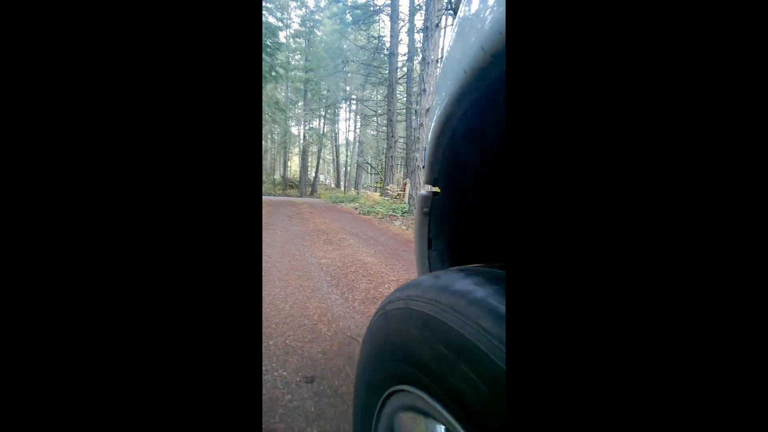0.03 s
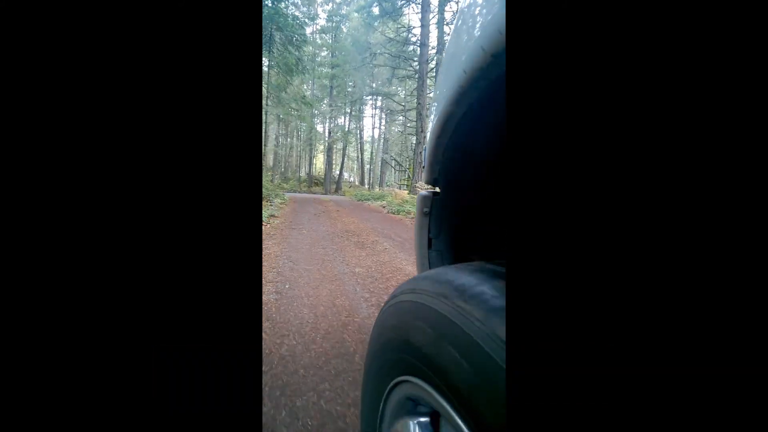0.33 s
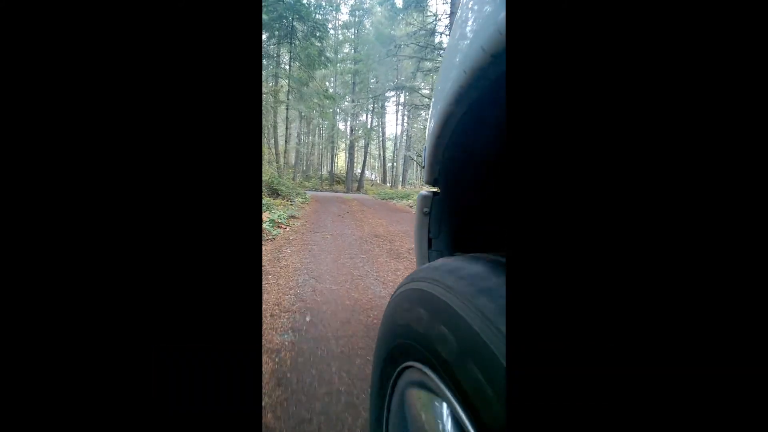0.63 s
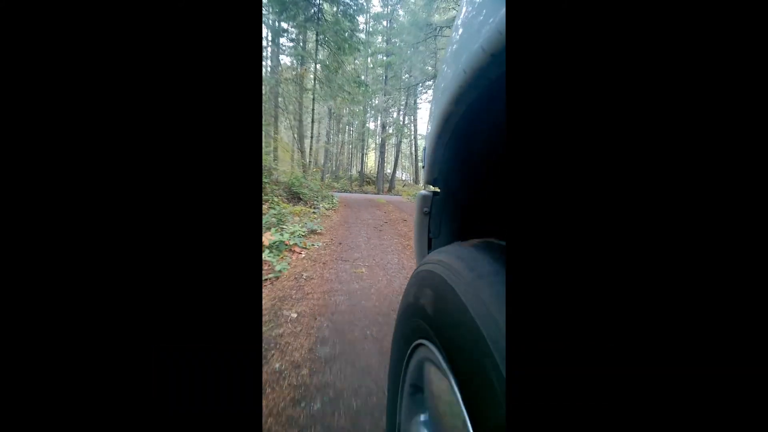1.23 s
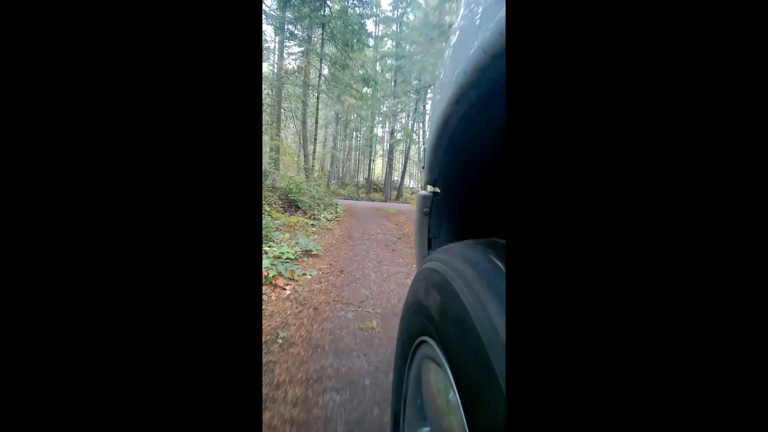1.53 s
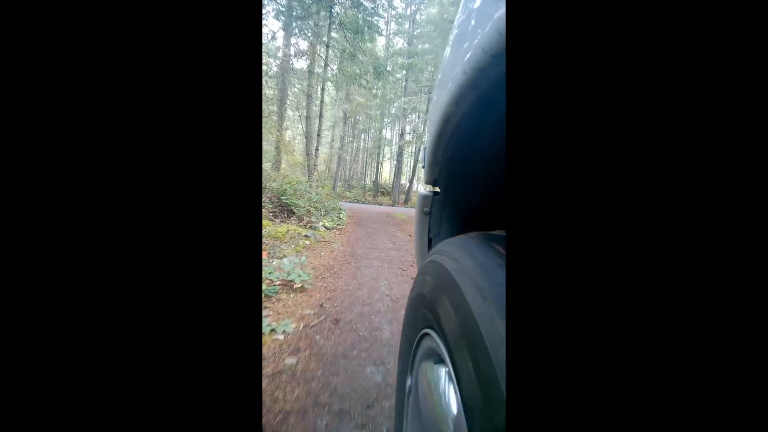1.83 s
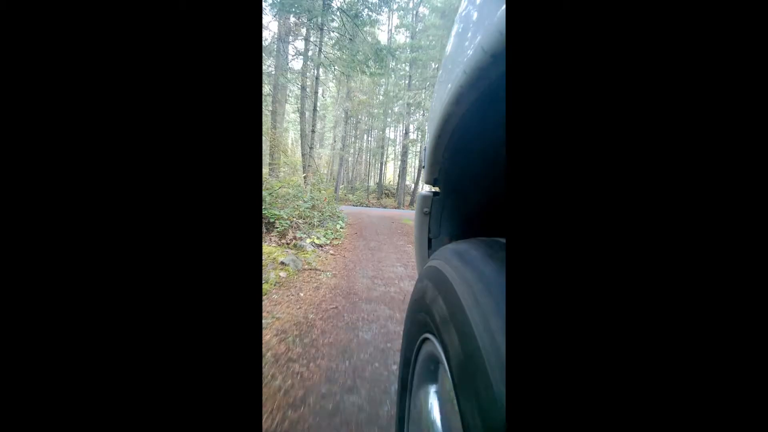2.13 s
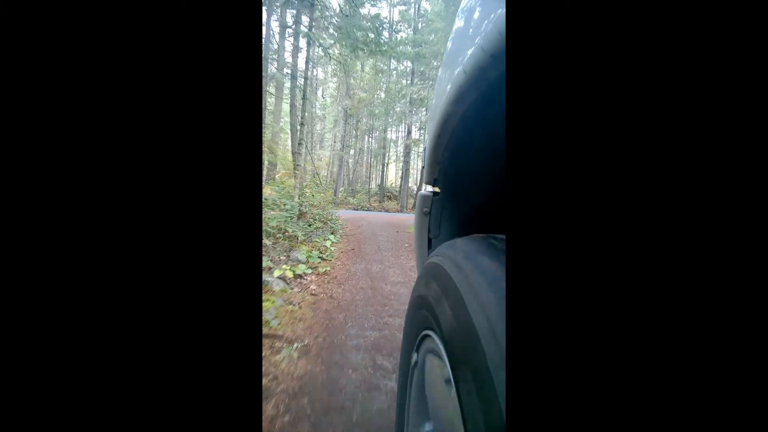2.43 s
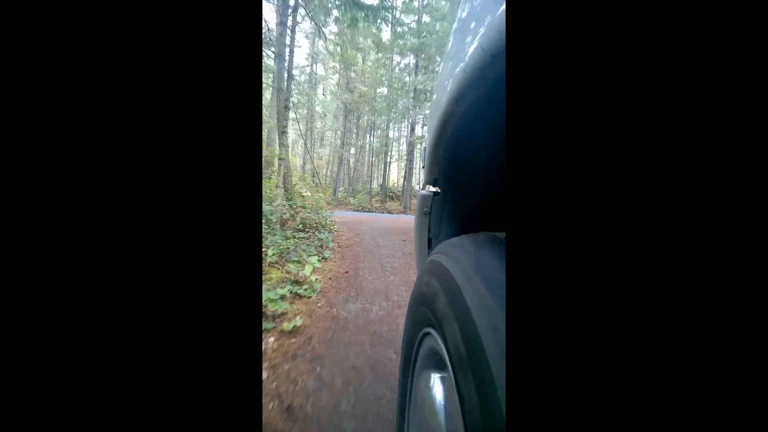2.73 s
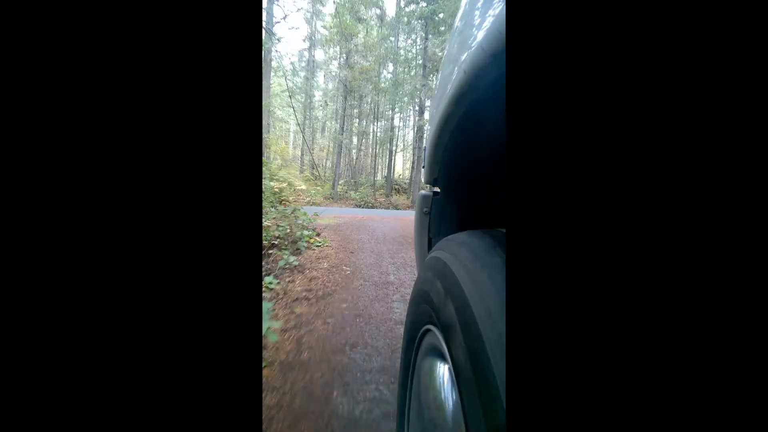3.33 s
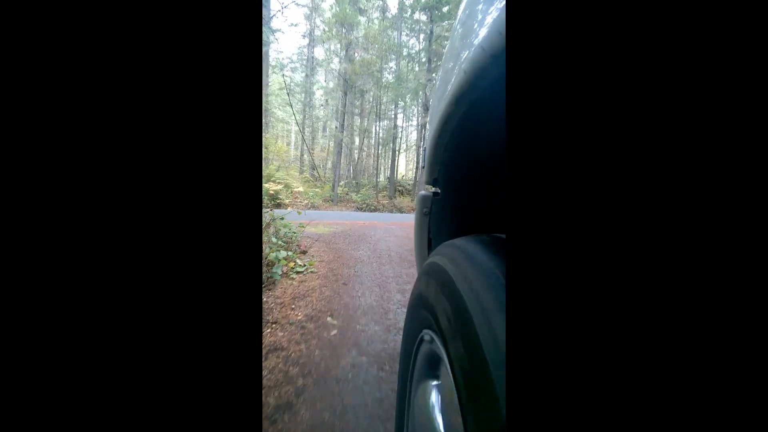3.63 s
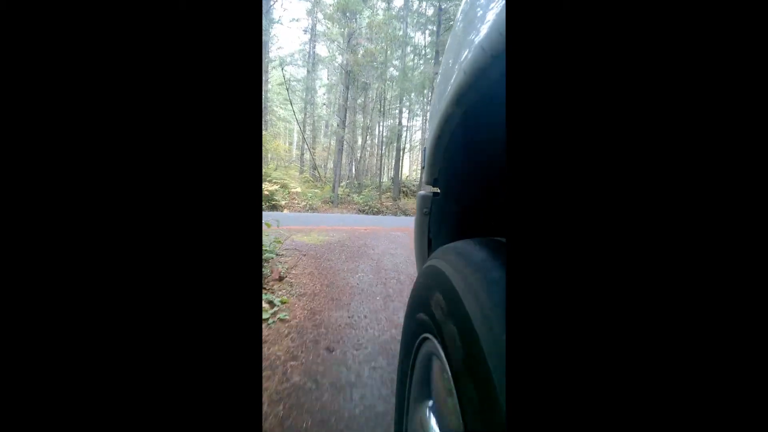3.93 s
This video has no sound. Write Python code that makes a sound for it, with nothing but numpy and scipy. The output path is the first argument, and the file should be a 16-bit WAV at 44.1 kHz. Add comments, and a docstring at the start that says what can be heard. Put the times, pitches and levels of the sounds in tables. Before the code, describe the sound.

A truck engine drones and eases off as its tyre rushes and crackles over grit.

```python
"""On a gritty forest road, a V8 truck rolls along, heard from just behind a front wheel.
The exhaust drones and spits a hissing tick once per crank turn, until the driver lifts off and the
engine slows. The tyre rushes and crackles over grit while the uneven road makes the body rumble.
Three stones knock, two sprays of debris rake the wheel well, and the wheel thuds into a rut.
Now and then the rushing sound dips for an instant, and thin glassy tones sound in the gap."""
import sys
import numpy as np
from scipy import signal
from scipy.fft import rfft, irfft
from scipy.io import wavfile
from scipy.ndimage import uniform_filter1d

SR = 44100
rng = np.random.default_rng(int(sys.argv[2]) if len(sys.argv) > 2 else 0)


def log_audio(samples):
    """Write samples as a 16-bit WAV file to the path given in sys.argv[1]."""
    # one column per channel
    frames = np.atleast_2d(samples).T
    # limit to full scale, then quantise
    limited = np.clip(frames, -1, 1)
    pcm = np.round(limited * 32767).astype(np.int16)
    wavfile.write(sys.argv[1], SR, pcm)


N = 176400
TIME = np.arange(N) / SR
FREQS = np.fft.rfftfreq(N, 1 / SR)

# brief dips in the rushing sound (time [s], depth [0-1])
RUSH_DIPS = [(.813, .82), (.983, .8), (1.046, .88), (1.537, .9), (1.643, .84), (1.795, .84), (1.963, .82),
             (2.05, .84), (2.199, .82)]


def exhaust(cycles):
    """Exhaust pulses make a stack of tones: a drone with the pedal down, a burble when coasting."""
    # how far the pedal is down (time [s], throttle [0-1])
    pedal = [(0, 0.76), (2.6, 1), (2.78, 0.45), (2.92, 0.63), (3.25, 0.12), (4, 0)]
    # engine tones (pitch [multiple of the cycle rate], level under load [dB], level coasting [dB])
    tones = [(3.03, -42, -27), (4.97, -21.5, -20), (7.06, -20, -24), (8, 0.5, 1.5), (8.99, -31, -21),
             (9.98, -36, -11), (11, -12, -25), (12, -26, -19), (13, -12, -14.5), (14, -32, -21),
             (15, -30.5, -22), (15.95, -34.5, -5.5), (16.82, -32.5, -22), (19, -29.5, -34),
             (20.05, -33.5, -32), (21.09, -22.5, -17.5), (23, -35.5, -29), (24.08, -27, -34),
             (25.8, -26.5, -32), (29.16, -43, -16.5), (31.88, -34.5, -30)]
    # loudness of the whole drone (time [s], level [dB])
    drone_levels = [(0, -11.5), (.5, -12), (1.1, -13), (1.6, -14), (1.9, -12.5), (2.1, -14.5), (2.42, -13),
                    (2.75, -17.5), (2.92, -21), (3.15, -22), (3.6, -26), (4, -25)]
    firing_order = 8  # eight cylinders fire in each cycle
    throttle, cycle_hz = curve(pedal), np.gradient(cycles, TIME)
    drone, power = 0, 0
    for order, load_db, coast_db in tones:
        gain = amp(coast_db + throttle * (load_db - coast_db) + pipe_db(order * cycle_hz))
        waver_db = (0.92 if order == firing_order else 1.33) * drift(rate_hz=3.6)
        drone += gain * amp(waver_db) * np.sin(2 * np.pi * (order * cycles + rng.random()))
        power += gain ** 2 / 2
    return amp(curve(drone_levels)) * drone / np.sqrt(power)


def pipe_db(hz):
    """The exhaust pipe boosts tones near the pitches it naturally rings at."""
    # pipe resonances (frequency [Hz], width [Hz], boost [dB])
    pipe_peaks = [(165, 24, 8), (224, 14, 7), (265, 13, 9)]
    return boost_db(hz, pipe_peaks)


def engine_hiss(cycles):
    """Gas hisses under load, and two of the eight cylinders each add a bright, ticking puff."""
    # when the ticks fall (place in the engine cycle [0-1])
    tick_places = [.02, .555]
    # tone colour of the hiss (frequency [Hz], level [dB])
    hiss_colour = [(150, -19), (350, 0.5), (550, 1), (950, -3.5), (1400, -1.5), (2000, -0.5), (2900, 1),
                   (3750, -6), (4700, -0.5), (5400, -6.5), (6200, -1.5), (8000, -4), (9200, -5.5),
                   (10500, -7), (12500, -11.5), (14500, -19), (16000, -14)]
    # extra brightness of a tick (frequency [Hz], boost [dB])
    tick_tilt = [(500, -16), (2000, -11), (4500, -4), (6500, 0), (12000, 1.5), (16000, 1.5)]
    # ticks compared with the hiss (time [s], level [dB])
    tick_levels = [(0, -4.5), (.6, -6), (1.2, -7), (2.2, -4), (2.6, -2), (3, -18)]
    # loudness of hiss and ticks together (time [s], level [dB])
    hiss_levels = [(0, -26.5), (.55, -26), (1.1, -26), (1.5, -27.5), (1.9, -27.5), (2.2, -28.5),
                   (2.4, -34.5), (2.68, -32), (2.9, -39.5), (4, -35.5)]
    # strength of the top treble (time [s], boost [dB])
    treble_levels = [(0, 2), (.6, 1.5), (1.2, -0.5), (2, -4.5), (2.7, -3.5)]
    tick_spread_db, treble_hz = 2.2, 10800
    puffs, cycle_s = np.zeros(N), np.gradient(TIME, cycles)
    for place in tick_places:
        count = cycles - place + 1  # passes a whole number at each tick
        strength = amp(tick_spread_db * rng.standard_normal(size=100))[count.astype(int)]
        puffs += strength * strike(count % 1 * cycle_s, rise_s=0.004, decay_s=0.009)
    hiss = noise(hiss_colour, well_db())
    tick_noise = noise(hiss_colour, well_db() + spectrum(tick_tilt))
    hiss += amp(curve(tick_levels)) * unit(puffs) * tick_noise
    lower = irfft(rfft(hiss) / (1 + (FREQS / treble_hz) ** 8), N)
    treble = hiss - lower
    return amp(curve(hiss_levels)) * (lower + amp(curve(treble_levels)) * treble)


def tyre():
    """The rolling tread makes a fluttering rush and crushes grit."""
    # tone colour of the tread (frequency [Hz], level [dB])
    tread_colour = [(190, -26), (330, -6), (388, -20), (470, -2), (510, -4), (704, -8), (800, -10),
                    (1650, -10), (2390, -11.5), (2810, -12.5), (7630, -16), (15500, -31.5)]
    # loudness of the tyre (time [s], level [dB])
    tyre_levels = [(0, -30.5), (1.2, -31.5), (2.2, -29.5), (2.75, -30), (3, -32), (3.3, -32), (3.6, -30.5),
                   (3.8, -32.5), (4, -35)]
    rush = noise(tread_colour, 0.78 * well_db()) * amp(0.79 * drift(rate_hz=30))
    return amp(curve(tyre_levels)) * (rush + amp(-9) * grit())


def grit(pitches=14, grains_per_s=600, spread_db=5):
    """Each crushed grain rings for a few vibrations, from dull pops to fine crackle."""
    # tone colour of the grit (frequency [Hz], level [dB])
    grit_colour = [(200, -1), (500, 6.5), (1300, 1.5), (3000, -12.5), (7000, -5), (11000, -10),
                   (16000, -32)]
    crackle = np.zeros(N)
    for hz in np.geomspace(450, 11000, pitches):
        sizes = amp(spread_db * np.minimum(rng.exponential(1, N), 4.5))
        crushed = rng.random(N) < grains_per_s / pitches / SR
        hits = sizes * crushed * rng.choice([-1, 1], N)
        vibrations = hz * TIME[:SR // 40]
        pop = np.sin(2 * np.pi * vibrations) * np.exp(-vibrations / 1.4)
        crackle += unit(signal.oaconvolve(hits, pop)[:N]) * np.sqrt(hz)
    return colour(crackle, grit_colour)


def well_db():
    """The wheel well, the hollow around the tyre, boosts a few narrow bands of pitch."""
    # wheel well resonances (frequency [Hz], width [Hz], boost [dB])
    well_peaks = [(2320, 65, 3), (2670, 41, 1.5), (3280, 41, 3), (4726, 90, -2), (6100, 61, 4),
                  (6400, 120, 0), (7882, 110, 3), (9880, 310, 3)]
    return boost_db(FREQS, well_peaks)


def rumble():
    """The uneven road shakes the truck's body."""
    # tone colour of the shaking (frequency [Hz], level [dB])
    rumble_colour = [(10, -26), (22, -13), (36, 2.5), (55, -8), (90, -2), (150, -2.5), (210, -13),
                     (300, -10.5), (420, -19), (800, -45)]
    # loudness of the shaking (time [s], level [dB])
    rumble_levels = [(0, -33), (.6, -28.5), (1, -37), (1.5, -28), (1.75, -27), (2.2, -28), (2.6, -28),
                     (3, -30), (3.5, -32.5), (4, -29.5)]
    return amp(curve(rumble_levels) + 1.8 * drift(rate_hz=5.6)) * noise(rumble_colour)


def stones(ring_delay_s=0.00149):
    """Stones knock on the wheel well: a dull crunch, then a ring that quickly dies."""
    # stone hits (time [s], level [dB], decay [s])
    hits = [(1.589, -12.5, 0.0054), (2.786, -26.5, 0.016), (3.563, -25, 0.025)]
    # tone colour of the crunch (frequency [Hz], level [dB])
    crunch_colour = [(100, -20), (300, -4), (700, 3), (1000, 3.5), (1280, 1), (1800, -4), (2600, -5),
                     (4000, -12), (8000, -30), (16000, -48)]
    # tones of the struck wheel well (frequency [Hz], relative level [dB], decay [s])
    ring_tones = [(660, -6.5, 0.01), (983, -8.5, .006), (1320, -5.5, 0.011), (2530, -8, 0.0043),
                  (3080, 3, .003)]
    crunch, ring = 0, 0
    for start, db, decay_s in hits:
        crunch += amp(db) * strike(since(start), rise_s=0.0012, decay_s=decay_s)
        age = since(start + ring_delay_s)
        for hz, tone_db, ring_s in ring_tones:
            ring += amp(db + tone_db) * np.sin(2 * np.pi * hz * age) * np.exp(-age / ring_s)
    return crunch * noise(crunch_colour) + amp(-6) * ring


def sprays():
    """Debris rakes the wheel well in short, gritty rasps."""
    # bursts of debris (time [s], length before fading [s], level [dB])
    bursts = [(1.976, 0.027, -17.5), (2.137, 0.019, -22.5)]
    # tone colour of the debris (frequency [Hz], level [dB])
    spray_colour = [(500, -17), (2000, -7.5), (3050, 1), (3900, -4.5), (5200, 0.5), (6100, -4), (6780, 7),
                    (7400, -10), (8200, 3), (8800, 1.5), (9800, -10), (16000, -28)]
    level = 0
    for start, length, db in bursts:
        level += amp(db) * strike(since(start), rise_s=0.0096, decay_s=0.014, fade_after_s=length)
    return level * noise(spray_colour) * amp(0.63 * drift(rate_hz=480))


def bump():
    """The wheel drops into a shallow rut and sends a soft thud through the suspension."""
    # tone colour of the thud (frequency [Hz], level [dB])
    thud_colour = [(100, -20), (230, 0), (400, -1), (600, -12), (1500, -32), (4000, -55)]
    return amp(-20) * strike(since(2.728), rise_s=0.0066, decay_s=0.019) * noise(thud_colour)


def panel(start_s=2.15, swell_s=0.045):
    """A metal panel rings faintly as the debris lets go."""
    # tones of the panel (frequency [Hz], level [dB])
    tones = [(930, -28), (2930, -27), (3110, -28), (4830, -30.5)]
    level = strike(since(start_s), rise_s=swell_s, decay_s=0.012, fade_after_s=swell_s)
    return level * sum(amp(db) * np.sin(2 * np.pi * (hz * since(start_s) + rng.random()))
                       for hz, db in tones)


def glassy_tones(count=7, half_width_s=0.014):
    """A few thin tones of random pitch sound through each dip in the rush."""
    out, edges_hz = np.zeros(N), np.linspace(700, 10000, count + 1)
    for centre_s, _ in RUSH_DIPS:
        near = abs(TIME - centre_s) < 3 * half_width_s
        offset_s = TIME[near] - centre_s
        pitches = rng.uniform(edges_hz[:-1], edges_hz[1:])
        tones = sum(np.sin(2 * np.pi * (hz * offset_s + rng.random())) for hz in pitches)
        out[near] += np.exp(-(offset_s / half_width_s) ** 2) * tones
    return amp(-34.5) * out


def dipped(rush, half_width_s=0.009):
    """The rush dips for an instant now and then, most in the treble."""
    # how much each pitch dips (frequency [Hz], share of the depth [0-1])
    reach = [(150, 0), (500, .85), (2000, .95), (7000, .95), (12000, 1)]
    depth = sum(peak * np.exp(-abs((TIME - at) / half_width_s) ** 3) for at, peak in RUSH_DIPS)
    return rush - np.clip(depth, 0, 0.92) * irfft(rfft(rush) * spectrum(reach), N)


def shimmer(hiss, depth_db=2.3, width_hz=50, linger_s=0.24):
    """Thin rings come and go in the hiss as narrow bands of pitch swell and fade."""
    frames = dict(fs=SR, nperseg=2048, noverlap=1536)
    hz, times, bands = signal.stft(hiss, **frames)
    wander = uniform_filter1d(rng.standard_normal(bands.shape), round(width_hz / hz[1]), axis=0)
    wander = unit(uniform_filter1d(wander, round(linger_s / times[1]), axis=1))
    return signal.istft(bands * unit(amp(depth_db * wander)), **frames)[1][:N]


def amp(db):
    """Turns decibels into a volume multiplier."""
    return 10 ** (np.asarray(db) / 20)


def unit(x):
    """Scales a signal to an average strength (rms) of 1."""
    return x / np.sqrt(np.mean(x ** 2) + 1e-20)


def since(start_s):
    """Seconds since an event, zero before it."""
    return np.maximum(TIME - start_s, 0)


def strike(age, rise_s, decay_s, fade_after_s=0):
    """The loudness of a hit: it rises in a straight line and dies away."""
    return np.minimum(age / rise_s, 1) * np.exp(-np.maximum(age - fade_after_s, 0) / decay_s)


def curve(points):
    """Joins (time, value) points with straight lines."""
    return np.interp(TIME, *np.transpose(points))


def spectrum(points):
    """Joins (frequency, value) points, giving each octave equal room."""
    hz, value = np.transpose(points)
    return np.interp(np.log(FREQS + 1), np.log(hz), value)


def boost_db(hz, peaks):
    """How much a set of resonances lifts each frequency."""
    return sum(db / (1 + (2 * (hz - centre) / width) ** 2) for centre, width, db in peaks)


def colour(x, points, lift_db=0):
    """Sets a sound's balance of low and high pitches, then scales it to strength 1."""
    return unit(irfft(rfft(x) * amp(spectrum(points) + lift_db), N))


def noise(points, lift_db=0):
    """Noise with the given tone colour, at strength 1."""
    return colour(rng.standard_normal(N), points, lift_db)


def drift(rate_hz):
    """Random wandering up to about this rate, at strength 1."""
    return unit(irfft(rfft(rng.standard_normal(N)) * np.exp(-(FREQS / rate_hz) ** 2) * (FREQS > 0), N))


def scene():
    """Mixes engine, tyre and road into one channel."""
    # engine speed (time [s], crank speed [turns per minute])
    revs = [(0.0, 1505.4), (0.2, 1518.6), (0.5, 1540.9), (0.85, 1528.6), (1.15, 1511.4), (1.45, 1535.7),
            (1.75, 1567.7), (2.1, 1564.8), (2.45, 1529.1), (2.72, 1511.8), (2.85, 1429.9), (3.0, 1336.2),
            (3.3, 1227.8), (3.6, 1213.4), (3.85, 1188.2), (4.0, 1118.8)]
    cycles = np.cumsum(curve(revs)) / 120 / SR  # engine cycles so far, two crank turns each
    rush = shimmer(engine_hiss(cycles) + tyre()) + stones() + sprays()
    return (exhaust(cycles) + rumble() + dipped(rush) + glassy_tones() + panel() + bump())[None]


def record(dry, cutoff_hz=15780):
    """Cuts away the very highest treble."""
    low_pass = signal.firwin(1023, cutoff_hz, window=("kaiser", 9), fs=SR)
    return signal.oaconvolve(dry, low_pass[None], "same")


dry = scene()
out = record(dry)
log_audio(out)
```